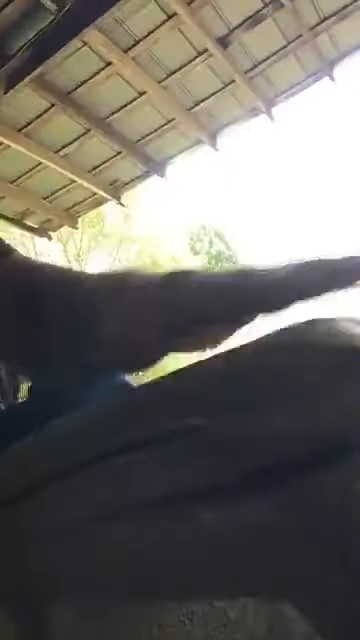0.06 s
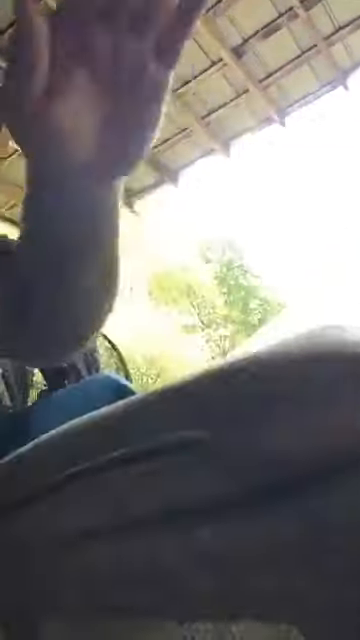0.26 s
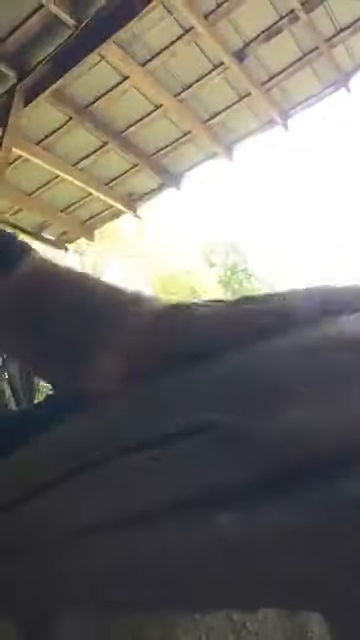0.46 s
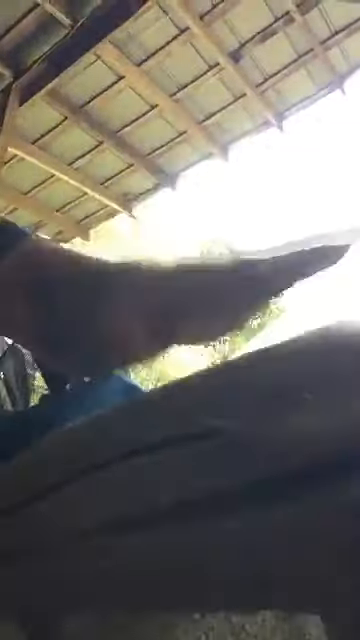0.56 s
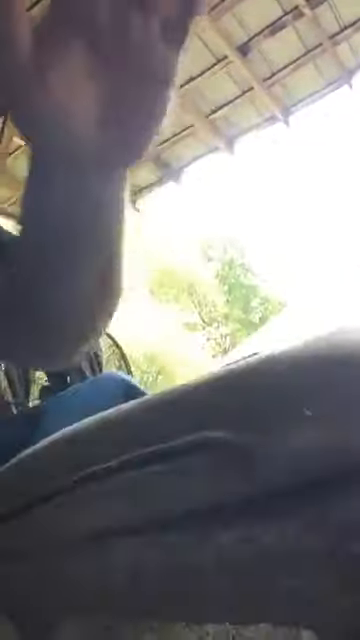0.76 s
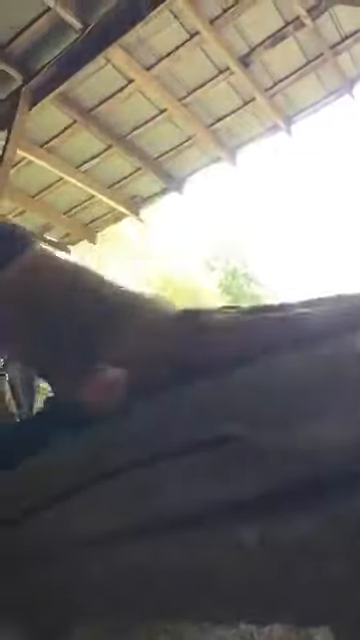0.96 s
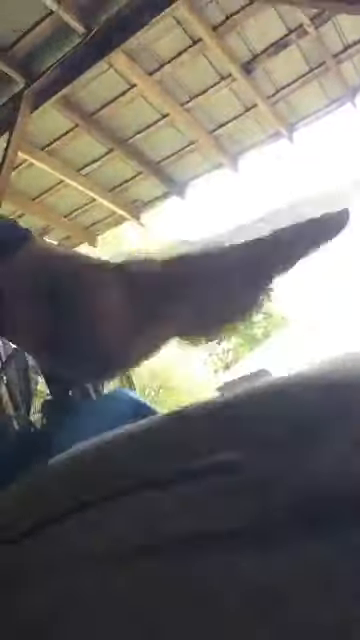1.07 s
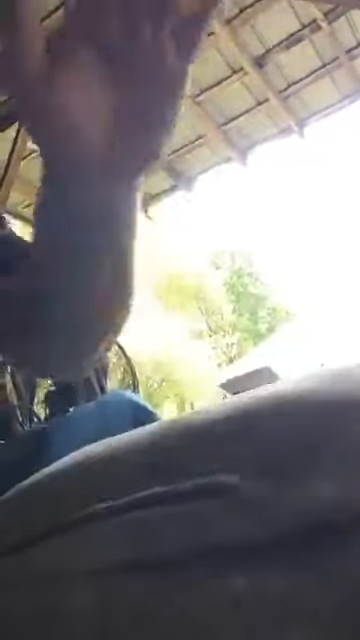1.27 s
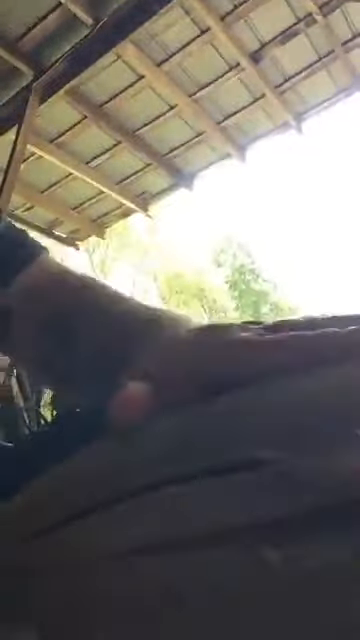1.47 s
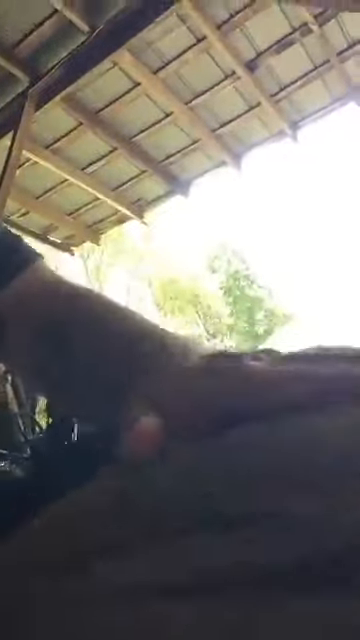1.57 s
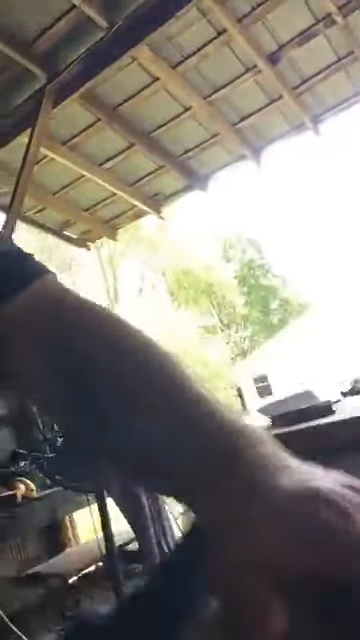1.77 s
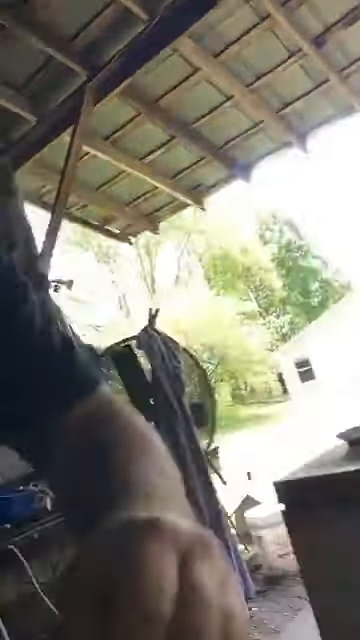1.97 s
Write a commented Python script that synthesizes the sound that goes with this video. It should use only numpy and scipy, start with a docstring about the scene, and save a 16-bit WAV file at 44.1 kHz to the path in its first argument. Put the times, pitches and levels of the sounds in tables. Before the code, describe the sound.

Four loud, evenly spaced palm slaps on a canvas sandbag, each a sharp crack with a dull knock and short shed echo, very close to a slightly overloading microphone; finally the hand scrapes off the bag.

```python
"""Four slaps on a canvas sandbag

An open hand slaps a canvas sandbag four times, close to a microphone, under an open shed roof.
Each blow is a noise crack of air squeezed from under the palm, rung through the palm's air pocket, with
damped sines for the bag's knock and thud, a sinking low push of air, shifting sand and the shed's answer.
Filtered noise makes the swishes, touches, rubs and a faint outdoor hum; the hand slides off at the end.
The microphone overloads on the loudest peaks."""
import sys
import numpy as np
from scipy import signal
from scipy.fft import rfft, irfft, next_fast_len
from scipy.io import wavfile
from scipy.ndimage import uniform_filter1d, map_coordinates

SR = 44100
rng = np.random.default_rng(int(sys.argv[2]) if len(sys.argv) > 2 else 0)


def unload_audio(sound):
    """Save the sound as a 16-bit wav file, at the path given as the first command line argument."""
    columns = np.transpose(np.atleast_2d(sound))
    # keep every value between -1 and 1, then stretch to whole-number steps
    steps = np.round(np.clip(columns, -1, 1) * 32767)
    wavfile.write(sys.argv[1], SR, steps.astype(np.int16))


N = 89082  # samples, about 2 s

# The four blows: t/s, crack level/dB, crack length/s, knock level/dB, knock f/Hz, thud level/dB, thud f/Hz,
# air push level/dB, settled air push f/Hz, sand level/dB, room trim/dB, extra gain of the thud into the room/dB
BLOWS = [(0.0519, -10.5, 0.0037, -9.5, 353, -17, 174, -30, 60.9, -34, -6.5, 11),
         (0.5133, -6.5, 0.0033, -8, 339.3, -7, 224.4, -18.5, 84, -31, -1.5, 3),
         (0.999, -4.5, 0.0051, -8, 367.3, -10, 236.7, -16.5, 55.5, -26.5, -4.5, 2),
         (1.4975, -6, 0.00541, -13, 351, -9.5, 228.5, -3.5, 53.5, -26.5, -3, -16.5)]


def amp(db):
    """Decibels to gain."""
    return 10 ** (np.asarray(db) / 20)


def unit(x):
    """Scaled to rms 1."""
    return x / np.sqrt(np.mean(x ** 2) + 1e-20)


def along(points, hz):
    """(f/Hz, value) points read on a log frequency axis."""
    f, v = np.transpose(points)
    return np.interp(np.log(hz + 1), np.log(f + 1), v)


def coloured(x, points):
    """x through a causal minimum-phase filter of unit power with this spectrum."""
    m = 2 * next_fast_len(len(x))
    gain = unit(amp(along(points, np.fft.rfftfreq(m, 1 / SR))))
    # Folding the cepstrum forward in time makes the filter minimum phase
    cepstrum = irfft(np.log(gain), m)
    cepstrum[1:m // 2] *= 2
    cepstrum[m // 2 + 1:] = 0
    response = np.exp(rfft(cepstrum))
    return irfft(rfft(x, m) * response, m)[:len(x)]


def noise(points, size):
    """Coloured noise of rms 1."""
    return unit(coloured(rng.standard_normal(size), points))


def fade(t, t60):
    """Full until t = 0, then down 60 dB every t60 seconds."""
    return np.exp(-np.log(1000) * np.maximum(t, 0) / t60)


def ring(t, hz, t60, rise):
    """A damped mode that starts at t = 0 with a soft attack."""
    t = np.maximum(t, 0)
    attack = 1 - np.exp(-t / rise)
    return np.sin(2 * np.pi * hz * t) * fade(t, t60) * attack


def add(track, s, x):
    """Mix x into the track at time s."""
    i = max(round(s * SR), 0)
    track[i:i + len(x)] += x[:max(len(track) - i, 0)]


def wobble(rate):
    """A smooth random curve, rate knots a second."""
    return map_coordinates(rng.standard_normal(N), [np.arange(N) * rate / SR])


def patchy(x, depth_db):
    """x with drifting patches of gain in time and frequency."""
    z = signal.stft(x, nperseg=512)[2]
    field = rng.standard_normal(z.shape)
    field = uniform_filter1d(field, size=7, axis=0)  # across frequency
    field = uniform_filter1d(field, size=5, axis=1)  # across time
    return signal.istft(z * amp(depth_db * unit(field)), nperseg=512)[1][:len(x)]


def outdoors():
    """A faint, slightly wavering hum and rush of air, made of filtered noise."""
    level_db, waver_db = -49, 0.94
    # Outdoor spectrum: f/Hz, relative level/dB
    ambient = [(15, -59.5), (25, -24), (37, -7), (53, 2.5), (102, -3), (145, -9.5), (175, -3.5),
               (236, -14.5), (309, -10.5), (335, -13), (373, -9.5), (575, -15.5), (695, -14.5), (1330, -21),
               (1560, -14), (2160, -24), (2910, -32), (4490, -41.5), (16000, -50.5)]
    return amp(level_db + waver_db * wobble(rate=36)) * noise(ambient, N)


def rubs(strokes, spectrum):
    """Friction of cloth: coloured noise with fast level grain and a shifting colour under each stroke."""
    fade_s, grain_db, grain_per_s, patch_db = 0.014, 1, 300, 2
    t = np.arange(N) / SR
    level = np.zeros(N)
    for s, length, db in strokes:
        inside = np.minimum(t - s, s + length - t)  # seconds from the nearer end, negative outside
        level += amp(db) * np.clip(.5 + inside / (2 * fade_s), 0, 1) ** 2
    cloth = patchy(noise(spectrum, N), patch_db)
    grain = amp(grain_db * wobble(grain_per_s))
    return level * unit(cloth * grain)


def sleeve_rubs():
    """The sleeve rustles as the arm moves."""
    # Rustles: start t/s, length/s, level/dB
    strokes = [(.1, 0.042, -52), (.735, 0.053, -54.5), (.885, 0.056, -48), (.94, .04, -56.5),
               (1.205, 0.07, -58), (1.7, 0.082, -55)]
    # Sleeve cloth spectrum: f/Hz, relative level/dB
    spectrum = [(200, -21), (900, 1), (1700, 5.5), (2800, 0.5), (4500, -15), (7000, -21), (12000, -32.5),
                (15500, -38.5)]
    return rubs(strokes, spectrum)


def palm_scrapes():
    """The palm scrapes over the canvas."""
    # Scrapes: start t/s, length/s, level/dB
    strokes = [(.025, .16, -57), (.882, 0.045, -60.5), (1.875, .16, -49), (1.908, 0.051, -49),
               (1.955, .075, -50)]
    # Palm-on-canvas spectrum: f/Hz, relative level/dB
    spectrum = [(200, -18.5), (900, -9.5), (1500, -2), (2700, 0), (4500, -15.5), (6500, -9.5),
                (9000, -12.5), (12500, -11), (15500, -28)]
    return rubs(strokes, spectrum)


def fingertip_drags():
    """The fingertips drag off the edge of the bag, more shrilly than the palm."""
    # Drags: start t/s, length/s, level/dB
    strokes = [(1.988, 0.044, -41)]
    # Fingertip spectrum: f/Hz, relative level/dB
    spectrum = [(600, -25), (1800, -8), (2700, 5), (3300, -1), (4500, -17), (6400, -1.5), (8500, -12),
                (12500, -10), (15500, -24)]
    return rubs(strokes, spectrum)


def touches():
    """Light ticks of skin and cloth around the blows, each a decaying burst of noise."""
    # Ticks: t/s, starting level/dB, t60/s
    ticks = [(.048, -15, 0.0035), (0.0889, -35.5, .04), (0.4928, -35.5, .008), (.978, -48, .02),
             (1.221, -59, .02), (1.4767, -30.5, 0.01)]
    # Tick spectrum: f/Hz, relative level/dB
    spectrum = [(300, -15.5), (1200, -2), (3500, 5.5), (6000, -7.5), (10500, -5), (15500, -19.5)]
    out, t = np.zeros(N), np.arange(SR // 8) / SR
    for s, db, t60 in ticks:
        add(out, s, amp(db) * noise(spectrum, len(t)) * fade(t, t60))
    return out


def swishes():
    """Air rushing ahead of the falling hand: noise that swells up to each blow and stops there."""
    level_db, rise_db_per_s = -29.5, 1101
    # Rush spectrum: f/Hz, relative level/dB
    spectrum = [(100, -5), (700, 4), (2500, -8), (8000, -12), (15500, -34.5)]
    t = np.arange(N) / SR
    swell = sum(amp(-rise_db_per_s * np.abs(t - s)) * (t < s) for s, *_ in BLOWS)
    return amp(level_db) * swell * noise(spectrum, N)


def shed(x):
    """The answer of roof and walls: x through a noise tail in which each frequency dies at its own speed."""
    delay_s = 0.0066
    # Decay of the shed: f/Hz, t60/s
    decay = [(100, 0.16), (260, .52), (1000, 0.27), (2500, 0.31), (6000, 0.3), (14000, 0.24)]
    # Spectrum of its answer: f/Hz, relative level/dB
    spectrum = [(60, -8.5), (140, -8), (230, -1.5), (330, -2), (600, -3), (1200, -1.5), (2200, 0.5),
                (3500, -5.5), (5000, -10), (10000, -8.5), (12000, -11.5), (15000, -24)]
    hz, t, z = signal.stft(rng.standard_normal(SR // 2), SR, nperseg=256)
    z = z * fade(t, along(decay, hz)[:, None])
    tail = signal.istft(z, SR, nperseg=256)[1]
    tail = coloured(np.pad(tail, (round(delay_s * SR), 0)), spectrum)
    return signal.fftconvolve(x, tail / np.linalg.norm(tail))[:len(x)]


def air_push(t, hz):
    """The low puff that reaches the microphone: a decaying sine that sinks towards hz."""
    start_ratio, sag_s, t60_s = 2.8, 0.0036, 0.066  # starting pitch over hz, time constant of the sinking
    t = np.maximum(t, 0)
    cycles = hz * (t + (start_ratio - 1) * sag_s * (1 - np.exp(-t / sag_s)))
    return np.sin(2 * np.pi * cycles) * fade(t, t60_s)


def crack(t, length):
    """A snap, then a few milliseconds of escaping air that swell and darken as the palm closes."""
    rise_db, t60_s = 3.5, 0.012
    contact_db, contact_t60_s = 0.5, 0.0004  # the snap of first contact
    fizz_db, fizz_t60_s = -9.5, 0.023  # canvas crackling on just behind the crack
    # The treble escapes first: f/Hz, lag/s
    lag = [(400, 0.0036), (900, 0.001), (2000, 0.00051), (5000, 0)]
    # Smooth spectrum in the mids, ragged in the treble: f/Hz, evenness (0-1)
    even = [(2500, 1), (4000, 0)]

    hz = np.fft.rfftfreq(len(t), 1 / SR)
    gate = fade(t - length, t60_s)
    shape = amp(rise_db * (np.minimum(t / length, 1) - 1)) * gate
    burst = shape * rng.standard_normal(len(t))
    for _ in range(3):  # the gate roughens the spectrum again, so even it out repeatedly
        z = rfft(burst)
        size = np.abs(z / np.abs(z).mean())
        burst = gate * irfft(z / size ** along(even, hz), len(t))
    # Summing the lag over frequency gives the phase that delays each band
    phase = -2 * np.pi * hz[1] * np.cumsum(along(lag, hz))
    burst = irfft(rfft(burst) * np.exp(1j * phase), len(t))
    contact = amp(contact_db) * fade(t, contact_t60_s)
    fizz = amp(fizz_db) * fade(t - length, fizz_t60_s)
    escaping = unit(burst) * np.sqrt(np.mean(shape ** 2))
    return escaping + (contact + fizz) * rng.standard_normal(len(t))


def palm_pocket(air, modes):
    """The air pocket under the palm rings: narrow resonances driven by the crack."""
    out = np.zeros(len(air))
    for hz, width, db in modes:
        b, a = signal.iirpeak(hz, hz / width, fs=SR)
        out += amp(db) * signal.lfilter(b, a, air)
    return out


def slaps():
    """Each blow: crack and palm pocket, then the bag's knock and thud, air push, shifting sand and the shed."""
    bag_lag_s, bag_rise_s = 0.0027, 0.00079
    knock_t60_s, thud_t60_s, sand_t60_s = 0.054, .025, 0.2
    shed_db, shed_knock_db, shed_pocket_db = -19, -3.5, -5.5  # overall answer, then sends into it
    # Colour of each crack, which changes with how the palm lands; per blow: f/Hz, relative level/dB
    crack_colours = [
        [(200, -20), (450, -18), (700, -17), (1000, -3), (1350, -4.5), (1900, -2.5), (2900, -3.5), (4500, -13),
         (7000, -15), (10500, -9), (13000, -21.5), (16000, -28)],
        [(200, -11), (450, -5), (700, -6), (1000, -2), (1350, -4.5), (1900, -3.5), (2900, -5), (4500, -8),
         (7000, -12), (10500, -14.5), (13000, -20), (16000, -26.5)],
        [(200, -12), (480, 1), (700, -13.5), (1000, -1.5), (1350, -2), (1900, -1), (2500, 1.5), (4500, -7.5),
         (7000, -10), (10500, -11.5), (13000, -25.5), (16000, -38.5)],
        [(200, -8), (450, -4), (700, -6), (1000, -1), (1350, -1.5), (1900, -1.5), (3600, 2), (4800, -7),
         (7000, -7), (10500, -9.5), (13000, -12), (16000, -28.5)],
    ]
    # Resonances of the air pocket under the palm; per blow: f/Hz, width/Hz, level over the crack/dB
    pocket_modes = [
        [(960, 84, 10.5), (1870, 160, 10.5)],
        [(1020, 290, -4.5), (1856, 130, 4.5)],
        [(1343, 130, 6.5), (2430, 240, 1)],
        [(589, 84, 9), (1772, 112, 0.5)],
    ]
    # Spectrum of sand shifting in the bag: f/Hz, relative level/dB
    sand_spectrum = [(300, -2.5), (1100, -4.5), (2300, -2), (5000, -14), (10000, -12), (12000, -18),
                     (14000, -32), (16000, -42)]

    out, t = np.zeros(N), np.arange(SR // 2) / SR
    late = t - bag_lag_s
    for blow, colour, modes in zip(BLOWS, crack_colours, pocket_modes):
        (s, crack_db, length, knock_db, knock_hz, thud_db, thud_hz,
         push_db, push_hz, sand_db, room_db, boom_db) = blow
        air = amp(crack_db) * coloured(crack(t, length), colour)
        pocket = palm_pocket(air, modes)
        knock = amp(knock_db) * ring(late, knock_hz, knock_t60_s, bag_rise_s)
        thud = amp(thud_db) * ring(late, thud_hz, thud_t60_s, bag_rise_s)
        push = amp(push_db) * air_push(late, push_hz)
        sand = amp(sand_db) * noise(sand_spectrum, len(t)) * fade(t, sand_t60_s)
        send = air + amp(shed_pocket_db) * pocket + amp(shed_knock_db) * knock + amp(boom_db) * thud
        room = amp(shed_db + room_db) * shed(send)
        # Knock and thud start with the opposite polarity to the push
        add(out, s, air + pocket - thud - knock + sand + push + room)
    return out


def scene():
    """The outdoor hum, the small sounds of hand and cloth, and the blows, as one channel."""
    cloth = sleeve_rubs() + palm_scrapes() + fingertip_drags() + touches()
    return (outdoors() + cloth + swishes() + slaps())[None]


def record(dry):
    """The microphone: a low cut, overload that rounds off the loudest peaks, then a steep treble limit."""
    low_cut_hz, top_hz = 39, 16300
    ceiling, knee = .88, 12  # a higher knee bends more abruptly
    low_cut = signal.butter(2, low_cut_hz, "highpass", fs=SR, output="sos")
    passed = signal.sosfilt(low_cut, dry)
    squashed = passed / (1 + np.abs(passed / ceiling) ** knee) ** (1 / knee)
    treble_limit = signal.ellip(10, .1, 80, top_hz, fs=SR, output="sos")
    return signal.sosfilt(treble_limit, squashed)


dry = scene()
out = record(dry)
unload_audio(out)
```